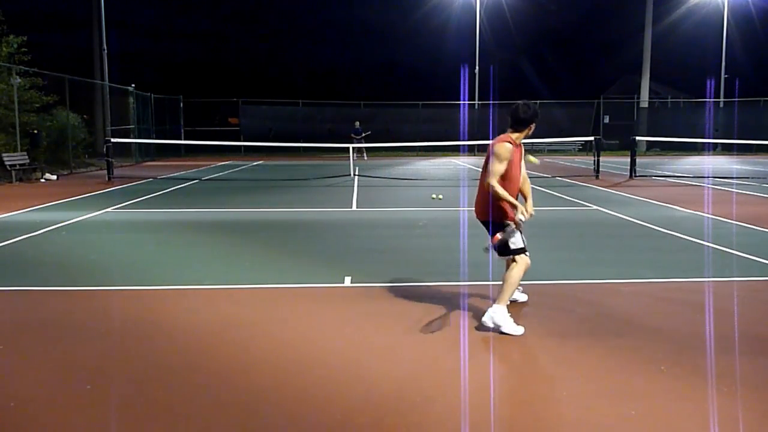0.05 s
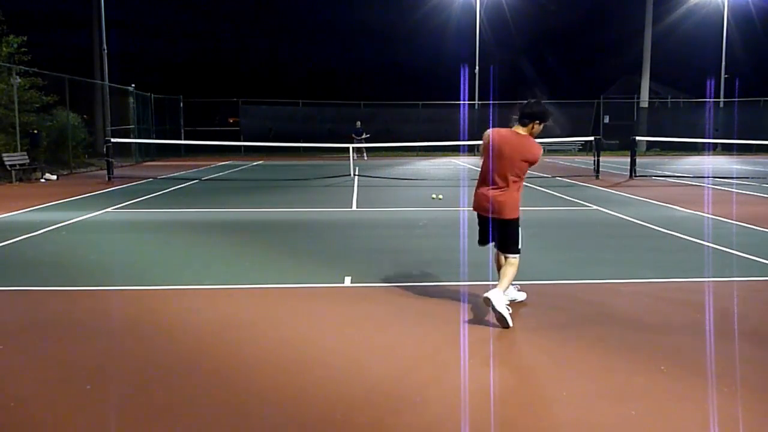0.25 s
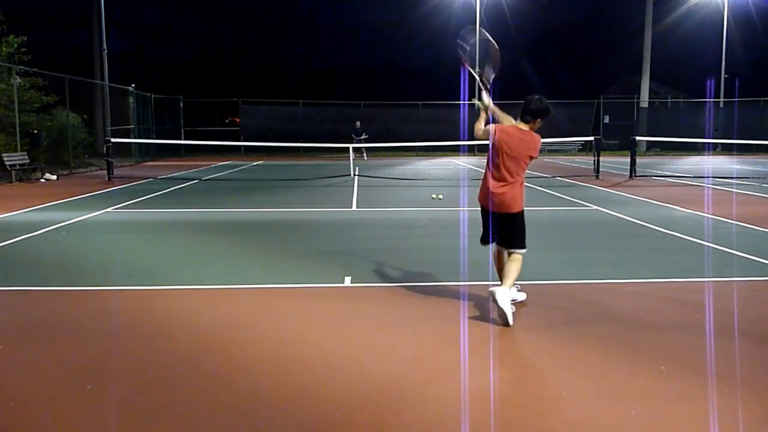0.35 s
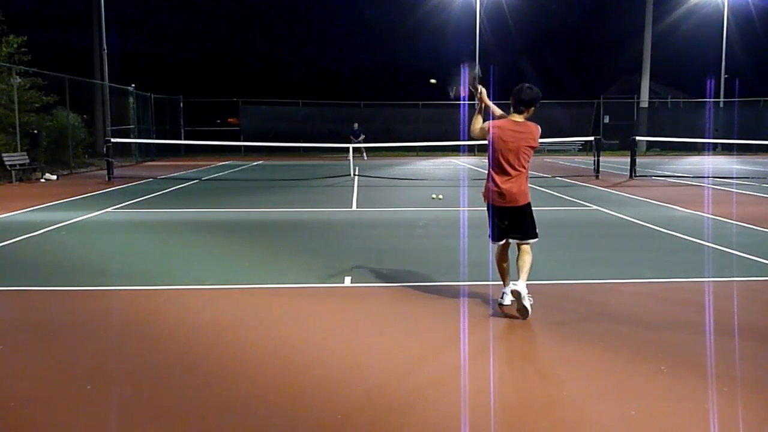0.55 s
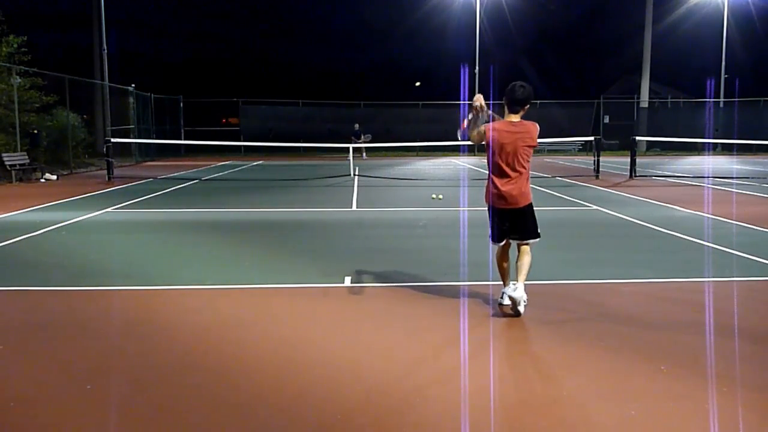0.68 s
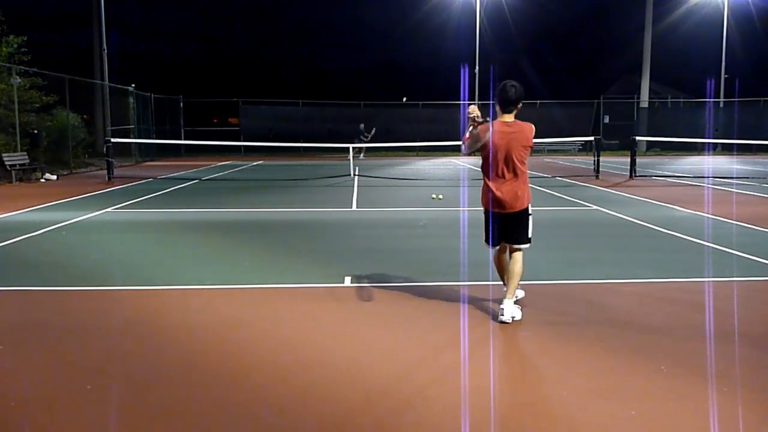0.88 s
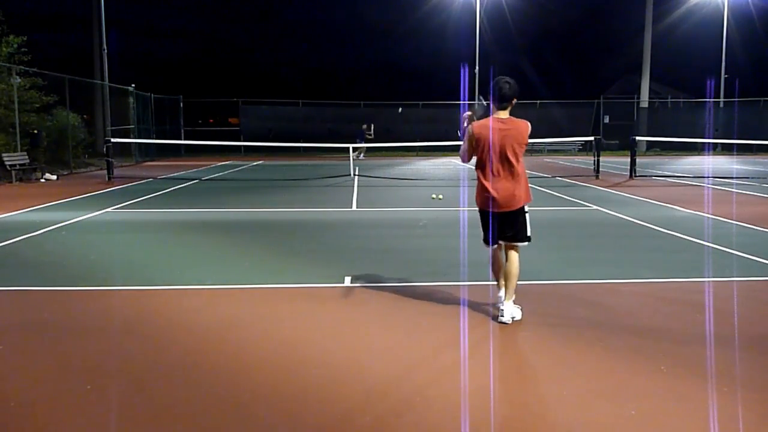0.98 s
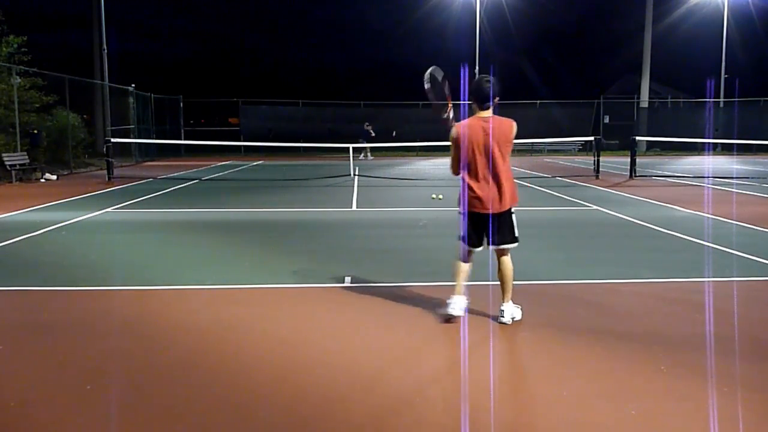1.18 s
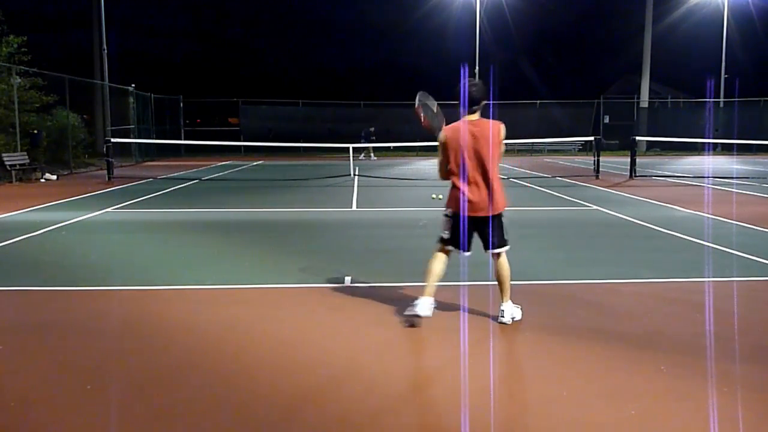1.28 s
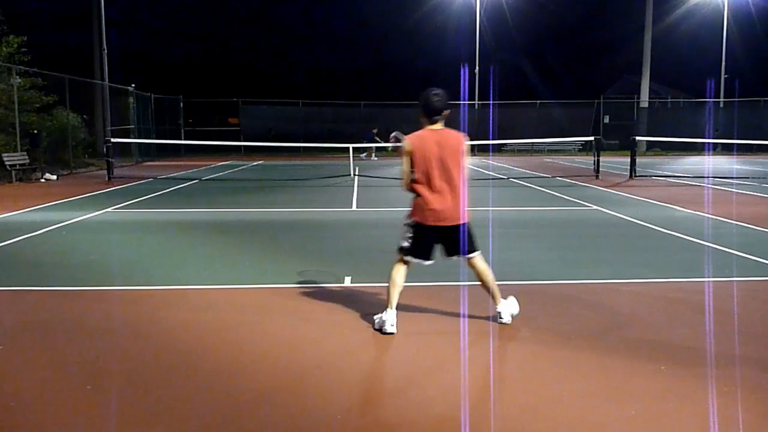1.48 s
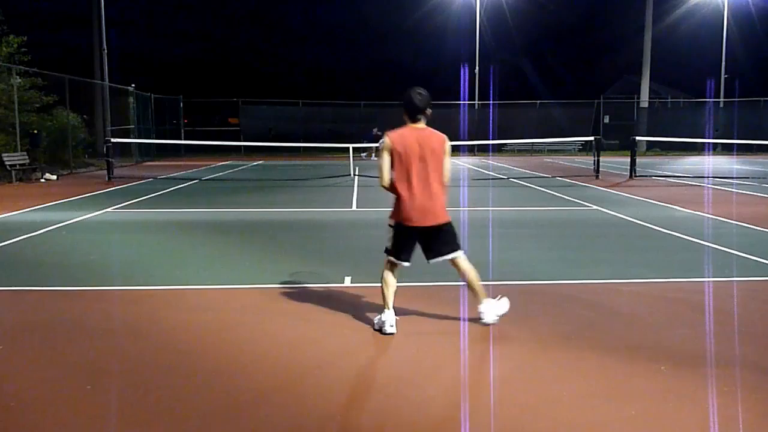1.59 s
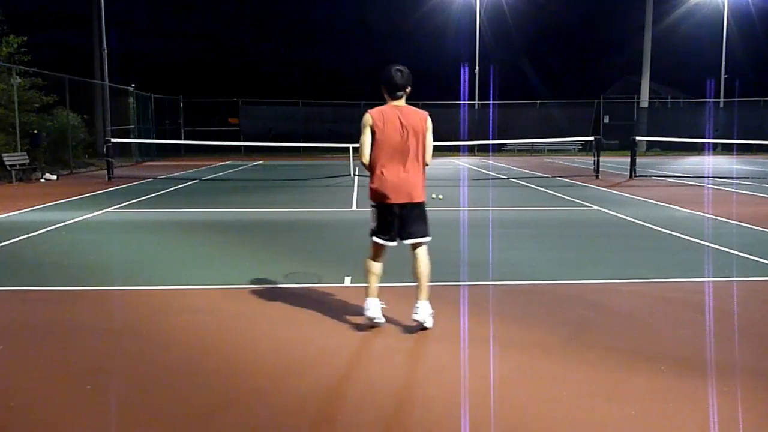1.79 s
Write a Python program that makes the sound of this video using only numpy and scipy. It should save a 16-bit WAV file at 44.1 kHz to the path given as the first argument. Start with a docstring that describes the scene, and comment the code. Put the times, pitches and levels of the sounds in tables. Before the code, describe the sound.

Sharp tennis hit near the start after a quick swish, followed by faint steps, a distant bounce, sole scuff and squeak, then a quiet far stroke; open hard court at night, hissy microphone with little bass.

```python
"""Night tennis on a hard outdoor court. Town hiss and two trilling crickets sound throughout, as shaped noise
and pulsed tones. First the near player swings (a noise swish) and strikes: the strings crack and ring, the ball
sings, and fences echo it; a faint racket-like clack follows. Shoes tap, the ball bounces beyond the net, a sole
scuffs and squeaks. Late on, after another tap, the far player returns the ball with a duller stroke; shoes follow.
The court's reverberation blurs the play; all is thin in the bass, notched near 8 kHz, quieter above, cut on top."""
import sys
import numpy as np
from scipy import signal
from scipy.fft import rfft, irfft
from scipy.io import wavfile
from scipy.ndimage import uniform_filter1d

SR = 44100
rng = np.random.default_rng(int(sys.argv[2]) if len(sys.argv) > 2 else 0)


def output_pcm(signal):
    """Save a mono or channel-first signal as 16-bit PCM at the path in sys.argv[1].

    Samples are clipped to [-1, 1] before scaling.
    """
    pcm = np.clip(np.atleast_2d(signal).T, -1, 1) * 32767
    wavfile.write(sys.argv[1], SR, np.round(pcm).astype(np.int16))


N = 81585  # length in samples
T = np.arange(N) / SR  # time of every sample, s


def undb(db):
    """Turn decibels into an amplitude factor."""
    return 10 ** (np.asarray(db) / 20)


def unit(x):
    """Scale a signal to an RMS of 1."""
    return x / np.sqrt(np.mean(x ** 2))


def noise():
    """White noise: an independent random value for every sample."""
    return rng.standard_normal(N)


def band(x, hz, width_hz):
    """Resonant band-pass: keeps the sound around one frequency."""
    return signal.lfilter(*signal.iirpeak(hz, hz / width_hz, fs=SR), x)


def low_pass(x, order, hz):
    """Keep what lies below a frequency, with a smooth roll-off above it."""
    return signal.sosfilt(signal.butter(order, hz, fs=SR, output="sos"), x)


def fade(start, t60, rise):
    """Rise from the start, while a decay of 60 dB per t60 takes over."""
    t = np.maximum(T - start, 0)
    decay = np.exp(-np.log(1000) * t / t60)
    return (1 - np.exp(-t / rise)) * decay


def hump(middle, length):
    """A smooth rise and fall, zero outside its length."""
    return np.cos(np.pi * np.clip((T - middle) / length, -.5, .5)) ** 2


def sine(start, hz):
    """A steady tone whose phase is zero at the start time."""
    return np.sin(2 * np.pi * hz * (T - start))


def gliding_sine(hz):
    """A tone whose frequency follows a curve: phase is the running sum of frequency."""
    return np.sin(2 * np.pi * np.cumsum(hz) / SR)


def ring(start, modes, rise):
    """A struck body: its modes all start ringing at one moment and die away separately."""
    return sum(undb(db) * fade(start, t60, rise) * sine(start, hz) for hz, db, t60 in modes)


def late(x, delay):
    """Delay a sound by a given time."""
    return np.interp(T - delay, T, x, left=0)


def walk(rate):
    """Smooth random drift with an RMS of 1, taking about `rate` new values per second."""
    hold = int(SR / rate)
    steps = np.repeat(rng.standard_normal(N // hold + 1), hold)
    smooth = uniform_filter1d(uniform_filter1d(steps, hold), hold)
    return unit(smooth[:N])


def spread(x, t60):
    """Many small reflections, as a noise tail of unit energy dying 60 dB in t60."""
    tail = noise() * fade(0, t60, t60 / 100)
    return signal.fftconvolve(x, tail / np.sqrt(np.sum(tail ** 2)))[:N]


TOWN_DB = -48
SWELL_DB, SWELL_RATE = 0.66, 0.77  # shared loudness drift: spread, new values per s
FLICKER_DB, FLICKER_RATE = 1.4, 12.11  # each slice's own drift
# Spectrum of the town hiss: f/Hz, level/dB (per Hz, relative)
TOWN_SPECTRUM = [(20, -12), (50, 7), (110, -3), (200, -5), (350, -2), (700, -4.5), (1200, -8.5),
                 (2500, -15), (4000, -18), (5500, -21.5), (7000, -23.5), (9000, -23), (11500, -24.5),
                 (14500, -41)]


def town():
    """Distant traffic and night air: noise in overlapping octave slices that swell together and flicker alone."""
    f = np.maximum(np.fft.rfftfreq(N, 1 / SR), 1)
    curve_hz, curve_db = np.array(TOWN_SPECTRUM).T
    spectrum = rfft(noise()) * undb(np.interp(np.log(f), np.log(curve_hz), curve_db))
    swell = walk(SWELL_RATE)
    out = 0
    for octave in range(11):
        window = np.cos(np.pi / 2 * np.clip(np.log2(f / 20) - octave, -1, 1)) ** 2
        loudness_db = SWELL_DB * swell + FLICKER_DB * walk(FLICKER_RATE)
        out = out + irfft(spectrum * window, N) * undb(loudness_db)
    return undb(TOWN_DB) * unit(out)


PULSE_SHARE = 0.78  # part of each cycle filled by the pulse
BETWEEN_PULSES = .2  # tone added to the gate, so it never goes silent
PULSE_SCATTER_DB = 1
# Crickets: f/Hz, pulse rate (per s), first pulse t/s, level/dB (RMS), pitch spread f/Hz
CRICKETS_SINGING = [(4089, 39.85, 0.0084, -64, 23.2), (2700, 37, 0.0018, -69.5, 30.9)]


def crickets():
    """Steady trills: a wavering tone in evenly timed pulses of uneven strength."""
    out = 0
    for hz, rate, first, db, spread_hz in CRICKETS_SINGING:
        cycle = ((T - first) * rate + .5) % 1 - .5  # zero at the middle of each pulse
        pulse = np.cos(np.pi * np.clip(cycle / PULSE_SHARE, -.5, .5)) ** 2
        tone = gliding_sine(hz + spread_hz * walk(60))
        strength = undb(PULSE_SCATTER_DB * walk(rate))
        out = out + undb(db) * unit((pulse + BETWEEN_PULSES) * tone * strength)
    return out


SWISH_S, SWISH_DB = 0.209, -49.5  # loudest moment, level there
SWISH_RISE_S, SWISH_FALL_S = 0.02, 0.068  # time to change by a factor e
SWISH_HZ, SWISH_WIDTH_HZ = 5970, 8100


def swish():
    """Air rushes through the strings of the swung racket: a broad band of noise grows, then fades."""
    before = np.minimum(T - SWISH_S, 0)
    after = np.maximum(T - SWISH_S, 0)
    shape = np.exp(before / SWISH_RISE_S - after / SWISH_FALL_S)
    return undb(SWISH_DB) * shape * unit(band(noise(), SWISH_HZ, SWISH_WIDTH_HZ))


RISE_S, THUMP_T60_S = 0.00096, 0.017
CRACK_DB, CRACK_T60_S, CRACK_HZ, CRACK_WIDTH_HZ = -11.5, 0.074, 2600, 8800
SCATTER_DB, SCATTER_T60_S = -2, .005  # blur added to each delayed copy
# Strokes; all but the first level are relative to it: t/s, level/dB, time on the strings t/s,
# thump f/Hz, thump level/dB, ball f/Hz, ball level/dB on the strings, ball level/dB once free,
# from leaving the strings to loudest t/s, t60 t/s of the free ball, treble cut-off f/Hz of the racket sound
RACKET_STROKES = [(0.2362, -12.5, 0.00364, 290, -1, 927, 0, 4.5, 0.0036, 0.019, 9400),
                  (1.5761, -27, 0.0049, 440, 7.5, 1037, -15, 11.5, 0.00054, 0.012, 1980)]
# Ringing of strings and frame: f/Hz, level/dB, t60 t/s
RACKET_MODES = [(617, -9.5, 0.056), (778, -4, 0.019), (1232, -10.5, 0.056), (1730, -11, 0.029),
                (1923, -4, 0.022), (1958, -12, 0.025), (2110, -16, .02), (2456, -11, 0.032),
                (2900, -8.5, 0.037), (3030, -10, 0.032), (3820, -13.5, 0.025), (4750, -14, 0.025)]
# Fence and wall echoes, one list per stroke; the last row of the first list is a separate faint,
# racket-like clack: delay t/s after the stroke, racket level/dB, ball level/dB
ECHOES_AND_CLACK = [
    [(.009, -38, -25.5), (.017, -26, -23.5), (.022, -28, -30), (.048, -35, -51), (.075, -38, -32.5),
     (.381, -22.5, -35)],
    [(.005, -30, -17.5), (.010, -21, -16), (.064, -13.5, -24), (.096, -28, -24)],
]


def racket_contact(start, thump_hz, thump_db, top_hz):
    """The blow makes strings and frame crack, thump and ring; the highest treble is rolled off."""
    crack = unit(band(noise(), CRACK_HZ, CRACK_WIDTH_HZ)) * fade(start, CRACK_T60_S, 0.001)
    modes = RACKET_MODES + [(thump_hz, thump_db, THUMP_T60_S)]
    touch = ring(start, modes, RISE_S) + undb(CRACK_DB) * crack
    return low_pass(touch, 2, min(top_hz, 20000))


def struck_ball(start, contact, hz, held_db, free_db, swell, t60):
    """The hollow ball sounds once while squashed on the strings, then swells and dies when free."""
    held = hump(start + contact / 2, contact) ** .5
    peak = start + contact + swell
    free = np.where(T < peak, hump(peak, 3 * swell), fade(peak, t60, 1e-9))
    free = uniform_filter1d(free, size=60)  # round off the corners
    return (undb(held_db) * held + undb(free_db) * free) * sine(start, hz)


def strokes():
    """Racket and ball sound together; blurred delayed copies make the echoes and one faint separate clack."""
    out = 0
    for stroke, copies in zip(RACKET_STROKES, ECHOES_AND_CLACK):
        start, db, contact, thump_hz, thump_db, hz, held_db, free_db, swell, t60, top_hz = stroke
        touch = racket_contact(start, thump_hz, thump_db, top_hz)
        ball = struck_ball(start, contact, hz, held_db, free_db, swell, t60)
        out = out + undb(db) * (touch + ball)
        for delay, touch_db, ball_db in copies:
            mix = undb(touch_db) * touch + undb(ball_db) * ball
            delayed = undb(db) * late(mix, delay)
            out = out + delayed + undb(SCATTER_DB) * spread(delayed, SCATTER_T60_S)
    return out


STEP_T60_S = .013
GRIT_DB, GRIT_T60_S, GRIT_HZ = -14, 0.023, 4700  # level relative to the tap
# Shoe taps: t/s, level/dB (before the rise), thud f/Hz
SHOE_TAPS = [(0.657, -38.5, 504), (0.7386, -28, 427), (.865, -36, 442), (1.492, -34.5, 910),
             (1.768, -36, 514)]


def taps():
    """A shoe lands: a short low thud with a little noisy grit under the sole."""
    grit = unit(band(band(noise(), GRIT_HZ, 3500), GRIT_HZ, 5000))
    out = 0
    for start, db, hz in SHOE_TAPS:
        thud = ring(start, [(hz, db, STEP_T60_S)], 0.00056)
        grit_shape = fade(start - .002, GRIT_T60_S, 0.0013)  # begins just before the thud
        out = out + thud + undb(db + GRIT_DB) * grit * grit_shape
    return out


BOUNCE_S, BOUNCE_DB = .8352, -31
BOUNCE_CONTACT_S, BOUNCE_RISE_S = .0042, .0012
LIFT_DB, LIFT_TOP_HZ = 3, 800  # only modes below this frequency knock again
SLAP_DB, SLAP_T60_S, SLAP_HZ, SLAP_WIDTH_HZ = -10, 0.032, 3500, 3500
# Ball against the court: f/Hz, level/dB (relative to the bounce), t60 t/s
BALL_MODES = [(317, -7.5, .018), (436, -4, 0.016), (530, -2.5, 0.024), (620, -8, 0.0086), (1014, -1, 0.03),
              (1410, 1.5, 0.023), (1860, 1, 0.019), (2330, -1, 0.017), (2980, -13, 0.013)]


def bounce():
    """The ball slaps and knocks as it lands; its low modes knock again as it lifts."""
    slap = unit(band(band(noise(), SLAP_HZ, SLAP_WIDTH_HZ), SLAP_HZ, SLAP_WIDTH_HZ))
    slap = slap * fade(BOUNCE_S, SLAP_T60_S, BOUNCE_RISE_S)
    landing = ring(BOUNCE_S, BALL_MODES, BOUNCE_RISE_S)
    low_modes = [mode for mode in BALL_MODES if mode[0] < LIFT_TOP_HZ]
    lift = ring(BOUNCE_S + BOUNCE_CONTACT_S, low_modes, BOUNCE_RISE_S)
    return undb(BOUNCE_DB) * (landing + undb(LIFT_DB) * lift + undb(SLAP_DB) * slap)


SCUFF_ROUGH_DB = 2
# Sole scuffs: start t/s, length t/s, level/dB, centre f/Hz
SOLE_SCUFFS = [(0.852, .04, -54, 3460), (1.036, 0.046, -55.5, 3830), (1.054, 0.09, -55.5, 3240),
               (1.758, 0.056, -56, 2000), (1.79, 0.047, -61, 10000)]


def scuffs():
    """The sole drags over the hard court: short humps of crackly, band-passed noise."""
    grains = noise() * undb(SCUFF_ROUGH_DB * walk(300))
    out = 0
    for start, length, db, hz in SOLE_SCUFFS:
        rub = unit(band(band(grains, hz, hz), hz, hz))
        out = out + undb(db) * hump(start + length / 2, length) * rub
    return out


SQUEAK_WOBBLE_HZ, SQUEAK_ROUGH_DB = 70, 3  # random spread of pitch and of level
# Squeaks of a sole: middle t/s, length t/s, start f/Hz, end f/Hz, level/dB (peak before roughness)
SOLE_SQUEAKS = [(1.055, .012, 3750, 3170, -40), (1.081, 0.026, 2610, 2720, -44.5),
                (1.063, .01, 3450, 3370, -47), (1.084, .014, 3700, 3800, -48),
                (1.103, 0.017, 2706, 2730, -54), (1.116, 0.0052, 3460, 3340, -47)]


def squeaks():
    """Rubber squeaks on the court: brief gliding tones with unsteady pitch and level."""
    out = 0
    for middle, length, start_hz, end_hz, db in SOLE_SQUEAKS:
        glide = np.interp(T, [middle - length / 2, middle + length / 2], [start_hz, end_hz])
        tone = gliding_sine(glide + SQUEAK_WOBBLE_HZ * walk(600))
        level = undb(db + SQUEAK_ROUGH_DB * walk(350))
        out = out + level * hump(middle, length) * tone
    return out


COURT_DB, COURT_T60_S = -22, 0.41


def scene():
    """Add the court's reverberation to the play, then the swish, crickets and town without it."""
    play = strokes() + taps() + bounce() + scuffs() + squeaks()
    court = undb(COURT_DB) * spread(play, COURT_T60_S)
    return (play + court + swish() + crickets() + town())[None]


BASS_CUT_HZ, SHELF_HZ, SHELF_DB = 170.6, 7770, -9
NOTCH_HZ, NOTCH_WIDTH_HZ, TOP_HZ = 7950, 1560, 14350


def record(dry):
    """The whole sound is thin in the bass, notched near 8 kHz, quieter above, and cut at the top."""
    x = signal.sosfilt(signal.butter(3, BASS_CUT_HZ, "high", fs=SR, output="sos"), dry)
    low = signal.sosfiltfilt(signal.butter(4, SHELF_HZ, fs=SR, output="sos"), x)
    x = low + undb(SHELF_DB) * (x - low)  # turn down only the treble
    x = signal.lfilter(*signal.iirnotch(NOTCH_HZ, NOTCH_HZ / NOTCH_WIDTH_HZ, fs=SR), x)
    return signal.sosfilt(signal.ellip(8, .2, 70, TOP_HZ, fs=SR, output="sos"), x)


dry = scene()
out = record(dry)
output_pcm(out)
```